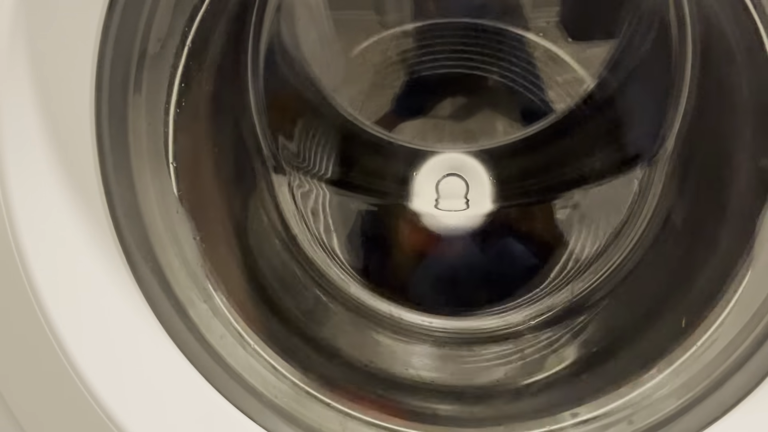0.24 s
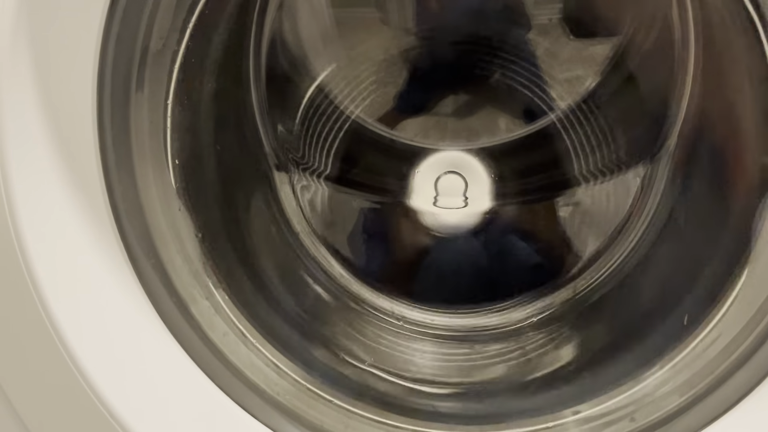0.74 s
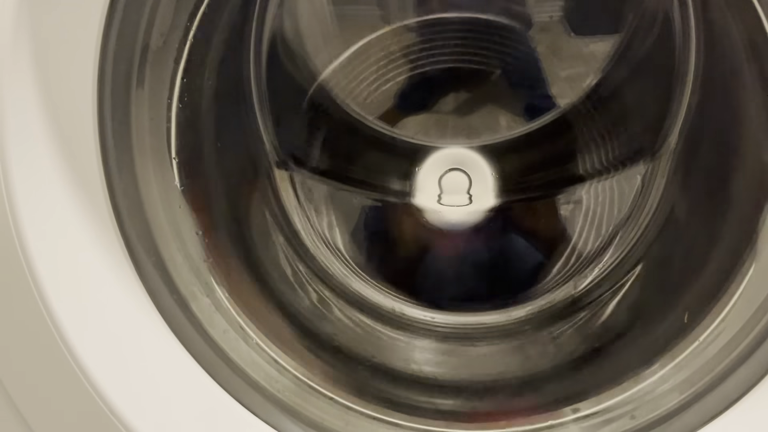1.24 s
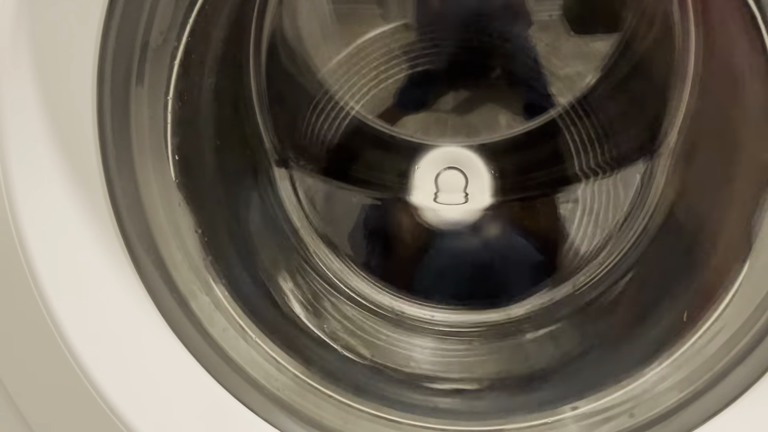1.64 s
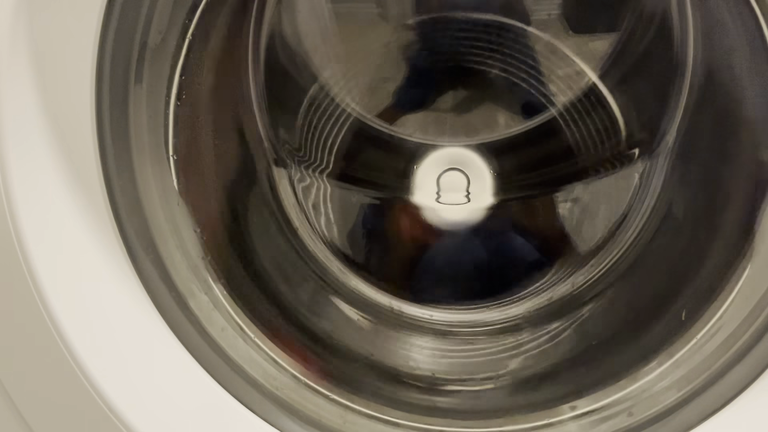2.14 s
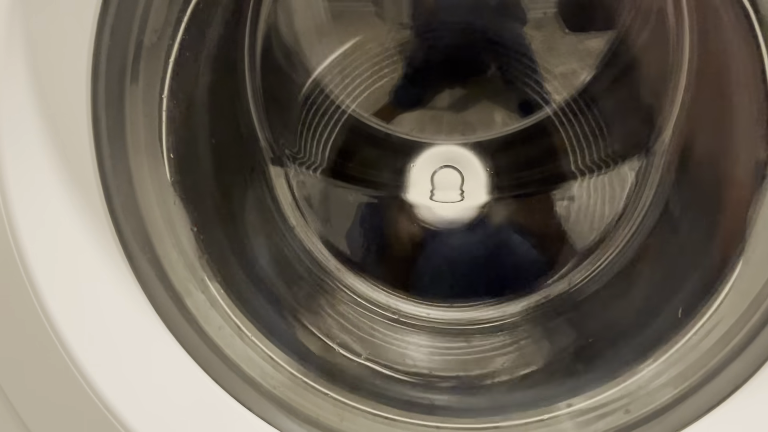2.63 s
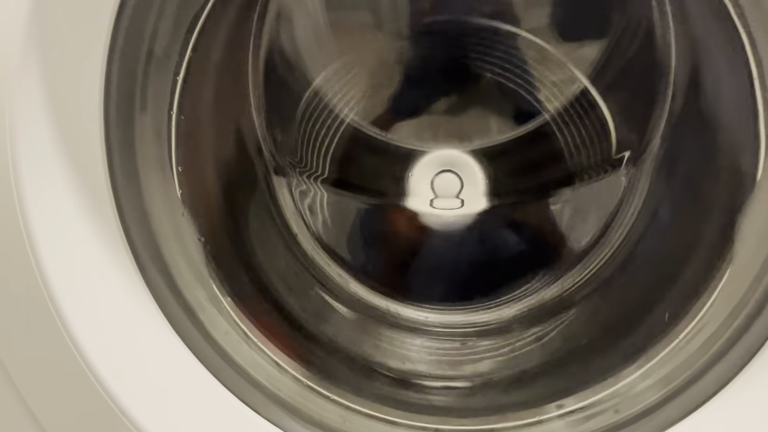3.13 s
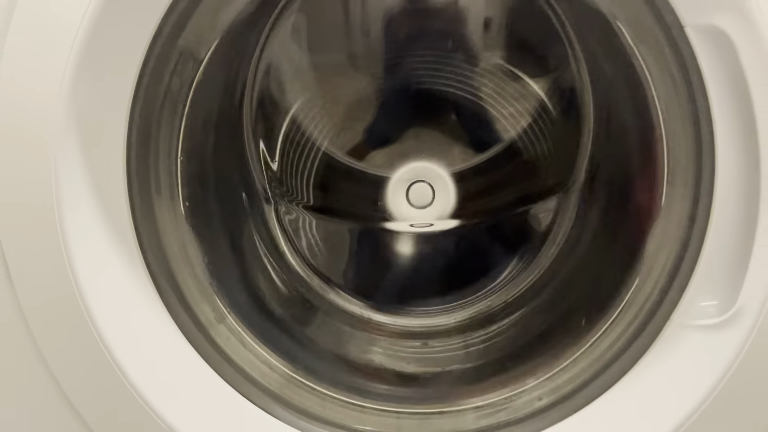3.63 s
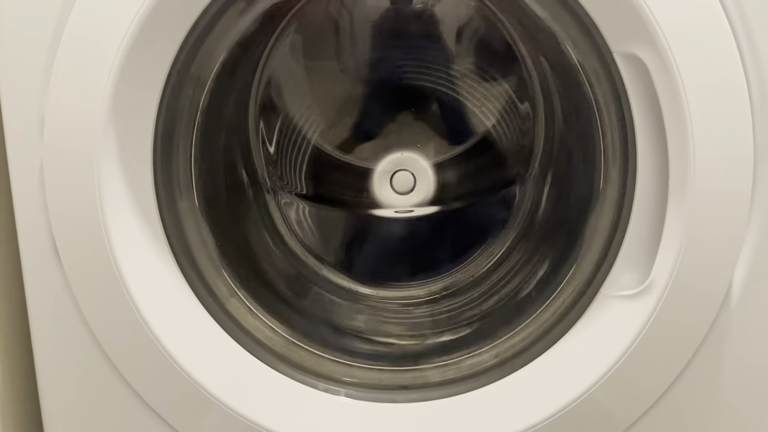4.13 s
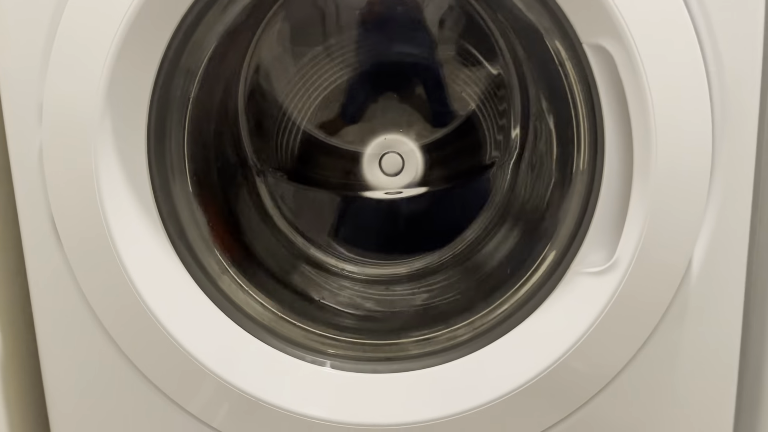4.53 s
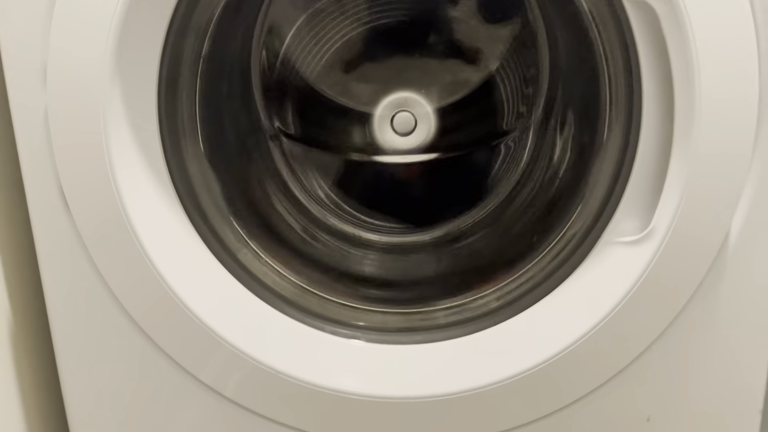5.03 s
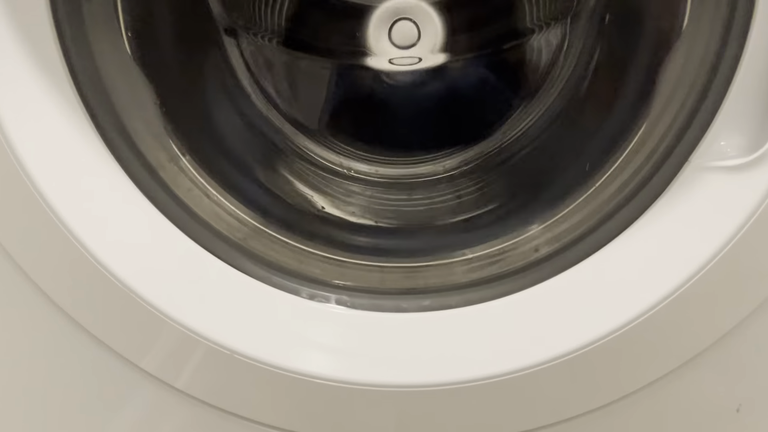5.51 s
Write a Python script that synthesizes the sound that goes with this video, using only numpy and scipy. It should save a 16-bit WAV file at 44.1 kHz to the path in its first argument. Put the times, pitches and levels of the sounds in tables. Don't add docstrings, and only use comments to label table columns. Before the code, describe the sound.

A front-loading washer is already spinning fast in a small room, heard close to its door in stereo. A motor hum creeps upward over a rough, fluttering cabinet rumble about nine times a second. Water spits and soft laundry slumps come irregularly. From the middle, a vehicle engine climbs outside, muffled; rumble and air rush grow stronger towards the end.

```python
import sys
import numpy as np
from scipy import signal
from scipy.fft import rfft, irfft, next_fast_len
from scipy.io import wavfile
from scipy.ndimage import uniform_filter1d

SR = 44100
rng = np.random.default_rng(int(sys.argv[2]) if len(sys.argv) > 2 else 0)


def ratio(d):
    e = np.asarray(d, float) / 20
    return 10 ** e


def log_audio(samples):
    frames = np.atleast_2d(samples).T
    limited = np.clip(frames, -1, 1)
    pcm = np.round(limited * 32767).astype(np.int16)
    wavfile.write(sys.argv[1], SR, pcm)


N = 254456
TIME = np.arange(N) / SR
SIZE = next_fast_len(N)

# frequency in Hz, dB per Hz.
AIR = [(400, 1), (700, 4), (1300, -4), (1700, -14), (3000, -15.5), (4600, -16.5), (6500, -21.5),
       (8500, -31), (11000, -34.5), (13000, -42), (13750, -38), (14300, -28), (14900, -42), (15700, -42)]


def level(x, db):
    return x * ratio(db) / np.sqrt(np.mean(x ** 2))


def curves(table):
    s, *columns = np.transpose(table)
    return [np.interp(TIME, s, c) for c in columns]


def over_hz(table):
    hz, *columns = np.transpose(table)
    bins = np.log(np.fft.rfftfreq(SIZE, 1 / SR) + 1)
    return [np.interp(bins, np.log(hz), c) for c in columns]


def ring(x, hz, width):
    return signal.lfilter(*signal.iirpeak(hz, hz / width, fs=SR), x)


def band(x, lo_hz, hi_hz):
    return signal.sosfilt(signal.butter(3, [lo_hz, hi_hz], "band", fs=SR, output="sos"), x)


def walk(rate, skip=1):
    hold = max(int(500 / rate), 2)
    steps = np.repeat(rng.standard_normal(3000 // hold + 1), hold)
    slewed = uniform_filter1d(uniform_filter1d(steps, hold), hold)
    return 1.3 * np.interp(TIME[::skip] * 500, np.arange(len(steps)), slewed)


def ports(direct, diffuse):
    # frequency in Hz, likeness 0-1, left leads in rad, left minus right in dB.
    bass_and_middle = [(30, .94, 0, -1), (90, .94, 0, -.3), (200, .82, 0, -.5),
                       (496, 0.41, -0.94, 1), (1400, 0.021, 0.72, -0.5), (1960, 0.43, 0.92, 2.5),
              (3100, 0.66, 1, 6.5), (4140, 0.85, 1, 4), (5500, 0.71, -2.85, 7), (5900, 1, -0.19, 1.5)]
    top = [(7300, .6, -2.2, 1), (7800, 1, -np.pi, 0), (8800, 1, -np.pi, 0), (9200, .75, -3.9, 0),
           (10950, .6, -5.1, 0), (11200, .97, -2 * np.pi, 0), (12900, .97, -2 * np.pi, 0),
           (13600, .6, -7.2, 0), (14300, .92, -8.3, 0), (14800, .9, -8.7, 0), (15000, 1, -3 * np.pi, 0)]
    like, lead, pan_db = over_hz(bass_and_middle + top)
    like = np.clip(like, 0, 1)
    mid = rfft(direct) * np.sqrt((1 + like) / 2)
    side = rfft(diffuse) * np.sqrt((1 - like) / 2)
    skew = ratio(pan_db / 2) * np.exp(.5j * lead)
    return np.array([irfft((mid + side) * skew, SIZE), irfft((mid - side) / skew, SIZE)])[:, :N]


def noise(spectrum):
    gain = ratio(over_hz(spectrum)[0])
    direct, diffuse = (irfft(rfft(rng.standard_normal(SIZE)) * gain, SIZE) for _ in range(2))
    return ports(direct, diffuse)


def motor(turn, speed):
    slot_orders = [36, 37, 35, 72, 48, 38, 39]
    slot_pan_db = [-2, -9, 4, 1.5, 10, 3, 0]
    # rest in dB, resonance in Hz, width in Hz, swell in dB.
    slot_swells = [(-48, 343, 15, 6.5), (-56.5, 337, 13, 9.5), (-65.5, 352, 19, 24), (-61.5, 684, 14, 8),
                   (-65.5, 463, 13, 15), (-68, 344, 11, 9.5), (-66.5, 352, 17, 5)]
    # lag in cycles, slide in cycles per s.
    slot_lags = [(0, 0), (-.11, .033), (.05, .11), (0, 0), (0, 0), (-.32, .02), (-.53, .02)]
    out = 0
    for order, swell, pan_db, (lag, slide) in zip(slot_orders, slot_swells, slot_pan_db, slot_lags):
        rest_db, hz, width, swell_db = swell
        db = rest_db + swell_db * np.exp(-((order * speed - hz) / width) ** 2)
        beat = lag + slide * TIME
        rough = (0.17 + 0.19 * TIME) * order / 36
        phase = 2 * np.pi * (order * turn - beat) + 0.33 * rough * walk(9)
        tone = np.sqrt(2) * ratio(db + rough * walk(14)) * np.cos(phase)
        out = out + tone * ratio(np.array([[pan_db], [-pan_db]]) / 2)
    return out


def shudder(turn, db):
    # multiple of the drum turn, rms in dB.
    drum_orders = [(3, -59), (4, -90), (5, -59.5), (6, -65.5), (7, -58.5), (8, -54.5), (9, -56.5),
                   (10, -56), (11, -51.5), (12, -67), (13, -69), (14, -55), (15, -52), (16, -56.5),
                   (17, -96), (18, -56), (19, -55), (20, -53), (21, -55), (22, -76.5), (23, -54), (24, -54),
                   (25, -55), (26, -61), (27, -54.5), (28, -69), (29, -55), (30, -58.5), (31, -65),
                   (32, -56)]
    arrival = [(3, .45, .9), (9, .25, .55), (15, .12, .5), (18, -.03, .2), (26, -.03, .2), (33, 0, .6),
               (63, .2, 1)]
    faint = [(k, -70) for k in range(38, 64)]
    orders, orders_db = np.transpose(drum_orders + faint)
    at_order, place, spread = np.transpose(arrival)
    skip = 16
    time = TIME[::skip]

    start = np.cumsum(np.interp(np.arange(64), at_order, place))[orders.astype(int)]
    scatter = np.interp(orders, at_order, spread)[:, None] * rng.uniform(-0.44, 0.45, (len(orders), 1))
    # 0.011 turns per order and s, all together at 0.8 s.
    fan = np.cumsum((orders - 24) * (abs(orders - 24) < 8)) * .011
    drift = np.array([[walk(rate, skip) for _ in orders] for rate in (.8, .9, 9)])
    cycles = np.outer(orders, turn[::skip]) - np.outer(fan, time - .8)
    phase = 2 * np.pi * (cycles - start[:, None] + scatter + 0.091 * drift[0])

    settle_db = np.outer(np.clip(1 - orders / 11, 0, 1), 3.5 - 1.06 * time)
    rock = np.exp(-(orders - 13.5) ** 2 / 2) - np.exp(-(orders - 9) ** 2 * 2)
    settle_db = settle_db + 1.5 * np.outer(rock, np.tanh((time - 1.74) / 0.93))
    size = np.sqrt(2) * ratio(orders_db[:, None] + settle_db + 1.6 * drift[1] + .8 * drift[2])

    aside = np.minimum(orders / 80, 1) * rng.standard_normal(len(orders))
    mid = (size * np.cos(phase)).sum(axis=0)
    side = aside @ (size * np.sin(phase))
    both = signal.resample_poly([mid + side, mid - side], skip, 1, axis=1)[:, :N]
    return both * ratio(db + np.array([[-.3], [.3]]))


def rumble(db):
    # frequency in Hz, dB per Hz.
    spectrum = [(25, -17), (45, 4), (100, 0), (200, -3.5), (300, -5), (450, -9), (700, -30), (5000, -73)]
    return level(noise(spectrum), 0) * ratio(db + 3.8 * walk(11))


def panel_drone(body):
    # resonance in Hz, width in Hz, gain in dB.
    panels = [(367, 14.3, 3), (510.6, 21.3, 6), (618, 29, -9.5), (691, 6.3, -8.5), (891, 7.1, -5),
              (1176, 5.8, 8), (1315, 29, -1)]
    return sum(ratio(db + 3.9 * walk(4.07)) * ring(body, hz, width) for hz, width, db in panels)


def inverter():
    # centre in Hz, width in Hz, gain in dB.
    switching_bands = [(13100, 100, -17), (14200, 54, -50), (14840, 120, -20), (15300, 52, 23),
                       (15700, 130, 29)]
    switching = noise(AIR)
    fizz = sum(ratio(db) * ring(switching, hz, width) for hz, width, db in switching_bands)
    return level(fizz, -62)


def air(turn, rush_db, hiss_db):
    x, swell = noise(AIR), walk(4.85)
    pulse = np.cos(2 * np.pi * (turn - .2))
    rush = panel_drone(band(noise(AIR), 200, 2000))
    for lo in 330 * 1.473 ** np.arange(4):
        rush = rush + band(x, lo, 1.435 * lo) * ratio(.5 * swell + 0.92 * walk(9))
    hiss = 0
    for lo in 1670 * 1.4875 ** np.arange(4):
        flicker_db = 1100 / lo * swell + 0.56 * walk(14) + 0.54 * pulse
        hiss = hiss + band(x, lo, 1.615 * lo) * ratio(flicker_db)
    top = band(x, 8450, 15750) * ratio(.2 * walk(25) + .8 * pulse + .4 * hiss_db)

    lean = ratio(2.5 * np.clip((TIME - 5.36) / .05, 0, 1))
    rush = level(rush, 0) * ratio(rush_db)
    hiss = level(band(hiss, 760, 9500), 0) * ratio(hiss_db) * np.sqrt(lean)
    return rush + hiss + level(top, -66.5) * lean


def thumps():
    # start in seconds, level in dB, centre in Hz, rise in seconds, length in seconds.
    slumps = [
        (2.289, -42, 620, .02, 0.1),
        (3.8, -49.5, 1670, 0.011, 0.075),
        (4.93, -41, 570, 0.06, 0.17),
        (5.41, -39, 570, .002, 0.027),
        (3.8, -39, 60, 0.0079, .03),
        (8.4, -41, 85.6, 0.0073, 0.054),
        (5.45, -39.5, 41, .02, 0.052),
        (0.51, -57, 1450, 0.018, 0.066),
        (1.1, -51.5, 980, 0.026, 0.099),
    ]
    x, out = noise(AIR), np.zeros((2, N))
    for s, db, hz, rise, length in slumps:
        age = np.clip(TIME - s, 0, None)
        shape = np.minimum(age / rise, 1) * np.exp(-(age / length) ** 2)
        out += level(band(x, hz / 1.37, hz * 1.47), db) * shape
    return out


def spits():
    # start in seconds, peak in dB, low splash in dB relative to it.
    sprays = [(0.2364, -49, -2.5), (0.462, -45, -4.5), (0.615, -50.5, -22), (0.688, -58, 7),
              (0.842, -60, 0), (1.1394, -49, -1.5), (1.265, -56, -3), (1.4794, -57, 8), (1.9525, -49.5, -4),
              (2.1494, -53, -16), (2.4638, -47, -2), (2.555, -57, -9), (2.785, -54, -3),
              (2.8987, -42, -2.5), (4.0994, -53, 4), (4.7022, -64, -1), (5.267, -57, 2)]
    spray, splash, out = noise(AIR), noise(AIR), np.zeros((2, N))
    spray_hz = 4630
    age = np.arange(int(.09 * SR)) / SR
    spray_shape = np.minimum(age * 200, 1) * np.exp(-(age / 0.05) ** 2)
    splash_shape = np.minimum(age / 0.002, 1) * np.exp(-age / 0.043)
    for s, db, low_db in sprays:
        cut = slice(int(s * SR), int(s * SR) + len(age))
        bright = band(spray[:, cut], spray_hz - 250, spray_hz + 650)
        dull = band(splash[:, cut], 960, 3900)
        out[:, cut] += level(bright, db - 10.5) * spray_shape
        out[:, cut] += level(dull, db + low_db + 0.5) * splash_shape
    return out


def engine():
    # time in seconds, firing rate in Hz.
    engine_speed = [(2.439, 113.5), (2.951, 143), (3.3, 168), (3.659, 182), (3.92, 186.6), (4.13, 189.1),
                    (4.55, 204), (5.4, 226.7), (5.55, 255)]
    # centre in Hz, width in Hz, rms in dB.
    window = [(121.4, 6, -39.5), (139.4, 9.1, -42.5), (153, 2.7, -42), (168.4, 8, -39.5), (183.1, 8, -38),
              (219, 12.6, -42.5), (228.5, 5.8, -39.5), (245, 11, -41)]
    hz, = curves(engine_speed)
    power = sum(ratio(db) ** 2 / (1 + (2 * (hz - at_hz) / width) ** 4) for at_hz, width, db in window)
    through = np.sqrt(power)
    phase = 2 * np.pi * np.cumsum(hz + 1.3 * walk(25)) / SR
    to_edge = np.minimum(TIME - engine_speed[0][0], engine_speed[-1][0] - TIME)
    fade = np.clip(to_edge / 0.086, 0, 1)
    tone = np.sin(phase) + ratio(-21.5) * np.sin(2 * phase) + ratio(-31) * np.sin(3 * phase)
    heard = np.sqrt(2) * tone * fade * through * ratio(2.6 * walk(16))
    return heard * ratio(np.array([[-1.5], [1.5]]))


def scene():
    # time in seconds, drum turns per second.
    drum = [(0, 8.8023), (1.5, 9.0107), (3, 9.2085), (4.5, 9.408), (5.77, 9.5873)]
    # time in seconds, strain 0-1.
    load = [(0, 0.08), (1.9, 0), (2.4, 0.34), (3.2, .36), (3.8, .5), (4.35, 0.66), (4.9, 1), (5.77, 0.73)]
    speed, strain = curves(drum)[0], curves(load)[0]
    turn = -.0187 + np.cumsum(speed) / SR
    machine = motor(turn, speed) + shudder(turn, 0.5 + 1.2 * strain) + rumble(-55.5 + 9.5 * strain)
    machine = machine + air(turn, -49.5 + 8 * strain, -58.5 + 4.5 * strain) + inverter()
    return machine + thumps() + spits() + engine()


def roll_off(x):
    return signal.sosfilt(signal.butter(12, 15760, fs=SR, output="sos"), x)


def record(dry):
    bass_cut = signal.butter(2, 24, "high", fs=SR, output="sos")
    mix = signal.sosfilt(bass_cut, dry * np.minimum(TIME * 200, 1))
    return roll_off(mix)


dry = scene()
out = record(dry)
log_audio(out)
```